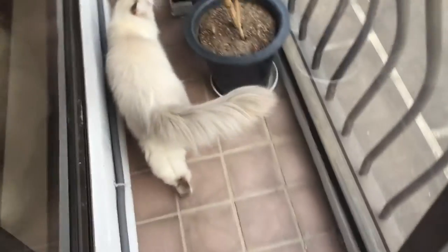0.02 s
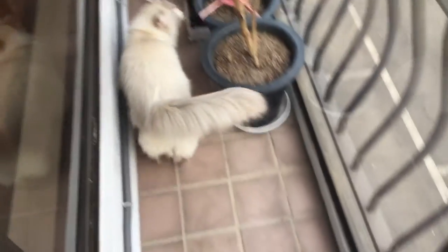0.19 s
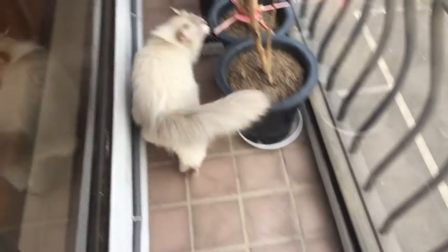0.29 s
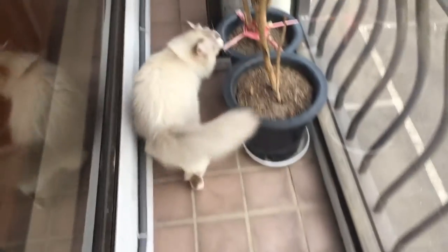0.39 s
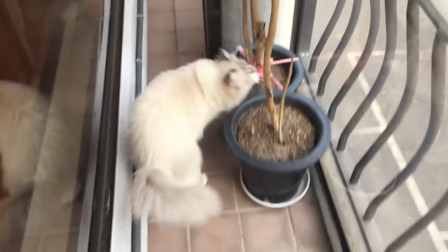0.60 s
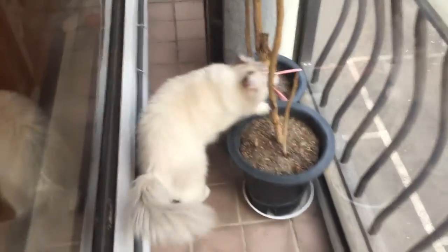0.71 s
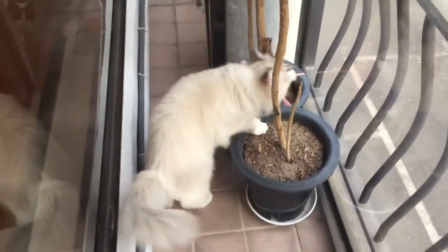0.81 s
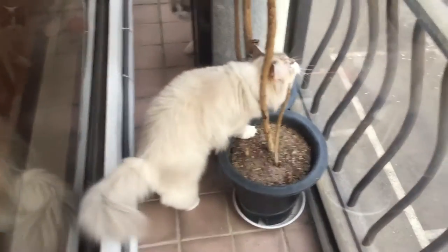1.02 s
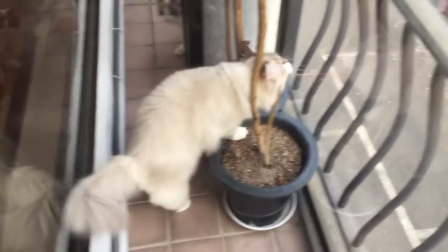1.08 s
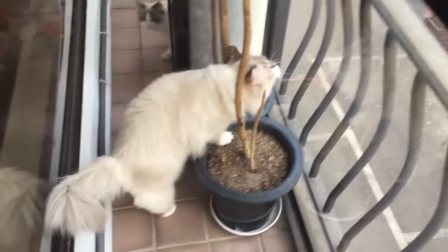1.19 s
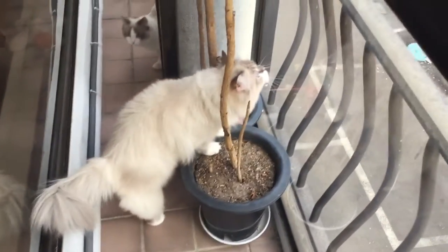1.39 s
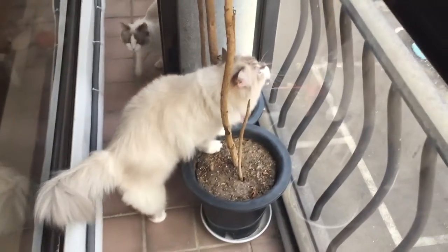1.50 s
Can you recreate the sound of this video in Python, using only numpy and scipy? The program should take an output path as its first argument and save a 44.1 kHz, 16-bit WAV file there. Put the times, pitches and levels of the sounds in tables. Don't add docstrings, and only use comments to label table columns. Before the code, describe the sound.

A cat gives one short trilling meow on a balcony, then a slipper knocks on tile

```python
import sys
import numpy as np
from scipy import signal
from scipy.io import wavfile
from scipy.ndimage import uniform_filter1d

SR = 44100
rng = np.random.default_rng(int(sys.argv[2]) if len(sys.argv) > 2 else 0)


def file_out(sig):
    cols = np.atleast_2d(sig).T
    lim = np.clip(cols, -1, 1)
    pcm = np.round(lim * 32767).astype(np.int16)
    wavfile.write(sys.argv[1], SR, pcm)


def ratio(d):
    e = np.asarray(d, float) / 20
    return 10 ** e


N = 66150

# f/Hz, level/dB per Hz
STREET_SPECTRUM = [(120, -27), (200, -5), (1140, -13.5), (1480, -12), (2130, -14), (2470, -17), (3490, -19),
                   (5330, -21), (16000, -33)]
# f/Hz, level/dB per Hz
RUMBLE_SPECTRUM = [(12, -38), (20, 0.5), (43, -5), (70, 6), (100, 0), (150, -10.5), (178, -8), (240, -37.5),
                   (310, -77), (530, -120)]
# f/Hz, level/dB
RAILING_TONES = [(1782, 0), (2143, -3), (2422, -5), (3601, -17), (4000, -13), (5254, -24), (5701, -25)]
# t/s, length/s, level/dB, tuning/ratio, tilt/dB per octave
RUBS = [
    (.054, 0.017, -50.5, 0.8, 6),
    (1.29, 0.017, -52, 0.99, 5),
    (1.308, .005, -60, 0.8, 8),
    (1.315, 0.0079, -53, 0.98, -17),
    (1.324, 0.015, -54.5, 1, -29),
    (1.34, 0.011, -58, 0.93, -1),
    (1.362, .004, -62, 1, -18),
]
# t/s, peak level/dB
CLAW_TICKS = [
    (.84, -54),
    (1.052, -51),
    (1.07, -42),
    (1.0875, -43),
    (1.345, -52),
    (1.394, -53),
    (1.438, -53),
    (1.481, -55),
]
# f/Hz, level/dB, time to fall 60 dB/s
CLAW_MODES = [(2500, -1.5, 0.011), (2755, -7.5, 0.032), (3690, 1, 0.0071), (4200, -6, 0.009),
              (4320, -6, 0.012), (5450, -7, 0.0041), (6930, -23, 0.0027), (8860, -15, 0.0047)]
# t/s, rise/s, fall/s, level/dB
RATTLES = [
    (1.058, 0.0022, 0.018, -71),
    (1.09, 0.016, 0.0074, -61),
]
# t/s, rise/s, fall/s, level/dB
FUR_SWISHES = [
    (.295, 0.018, 0.012, -63.5),
    (.48, 0.034, 0.042, -73.5),
    (.54, 0.027, 0.017, -69.5),
]
# t/s, rise/s, fall/s, level/dB
SCUFF_SWELLS = [(.02, 0.25, 0.041, -50), (.1, 0.027, 0.019, -54.5), (.31, 0.0061, 0.0052, -59),
                (.6, 0.045, 0.018, -66), (.77, 0.025, 0.037, -66), (.845, 0.011, 0.021, -62.5),
                (.91, 0.013, 0.012, -62), (.955, 0.024, 0.014, -63), (1.18, 0.0067, 0.088, -56),
                (1.225, 0.014, 0.02, -47.5), (1.3, 0.005, 0.013, -62), (1.41, 0.011, 0.011, -65)]
# f/Hz, level/dB per Hz
SCUFF_SPECTRUM = [(180, -43), (300, -11), (447, -37), (1100, -15), (1480, -15.5), (1720, -11.5),
                  (3580, -10.5), (9550, -18), (16000, -24)]
# t/s, peak level/dB, tuning/ratio, tilt/dB per octave
SOLE_KNOCKS = [
    (.906, -44, .9, 2),
    (.917, -52, 1.0, 3),
    (.94, -58, 1.05, 4),
    (.97, -54, .88, -8),
    (1.171, -38, 1.03, 1),
    (1.198, -40, .9, -18),
    (1.206, -44, .88, -18),
    (.51, -53, .9, -6),
]
# f/Hz, level/dB, time to fall 60 dB/s
SOLE_MODES = [(335.8, 5.5, 0.055), (500, -27, 0.036), (685, -5, 0.036), (855, -1.5, 0.017),
              (1153, -5.5, 0.028), (1495, -3.5, 0.019), (1665, -1, 0.01), (1945, -2.5, 0.019),
              (2600, -3, 0.0085), (4540, -13, 0.0067)]
# t/s, pitch f/Hz, level/dB, roughness/0 to 1
CREAK_PART = [
    (0.14, 286, -60, .6),
    (.16, 284, -51, .5),
    (0.184, 290, -45, 0.5),
    (0.192, 400, -46, .3),
    (0.208, 380, -47, 0.25),
    (.224, 425, -43, .3),
    (0.238, 432, -43, 0.3),
]
CHIRP_PART = [
    (.244, 445, -46, .4),
    (.2475, 460, -34, .5),
    (.251, 475, -30, .5),
    (.255, 498, -35, .3),
    (.264, 507, -27, .2),
    (.274, 512, -38, .2),
    (.28, 513, -27, .12),
    (.293, 515, -30, .15),
    (.299, 525, -43, .5),
]
WAVER_PART = [
    (0.309, 555, -41.5, 0.25),
    (0.317, 574, -41, 0.088),
    (0.356, 573.8, -38, .08),
    (0.376, 609.3, -35.5, 0.055),
    (.396, 612, -30.5, 0.067),
    (0.412, 575.3, -47.5, 0.18),
    (0.432, 599.4, -28.5, 0.071),
    (0.449, 606.9, -29.5, .05),
    (0.468, 591.3, -32.5, 0.17),
]
DRAWL_PART = [(0.479, 508, -35.5, 0.095), (0.491, 565, -32, 0.092), (0.502, 603.5, -29, 0.11),
              (0.521, 588.5, -25.5, 0.098), (0.539, 548.6, -27, 0.074), (0.552, 560.8, -31, 0.114),
              (0.564, 564, -31.5, 0.25), (0.584, 568.8, -35, 0.16), (0.6, 597.7, -40, 0.3),
              (0.644, 589, -47, 0.12), (0.667, 650, -58.5, 1)]
# t/s, first resonance f/Hz, second resonance f/Hz, brightness level/dB
MOUTH_SHAPE = [(.14, 540, 1750, -28), (.19, 645, 1790, -11.5), (.23, 835, 2080, -1), (.26, 1070, 2330, 8.5),
               (.287, 1220, 2090, 13), (.31, 1160, 2360, 4), (.345, 1400, 2840, -8), (.385, 1460, 2500, 13),
               (.45, 1710, 2500, 5), (.465, 1740, 2600, -11.5), (.485, 1400, 2200, -12),
               (.515, 1810, 2660, 21), (.54, 1240, 2460, 6), (.575, 1500, 2500, -1.5),
               (.61, 1370, 2600, -5), (.66, 1270, 2400, 3)]
# t/s, third resonance level/dB, fourth resonance level/dB, hum through the nose level/dB
THROAT_SHAPE = [(.2, -11, -51, -71), (.29, -52, -36.5, -58), (.33, -11, -17, -47), (.375, -35, -30.5, -52),
                (.41, -8, -24, -47), (.44, -23, -39, -48), (.465, 1.5, -43, -50), (.488, 0, -24.5, -66),
                (.505, -10.5, -32.5, -48.5), (.54, 0, -32.5, -58.5), (.57, 0.5, -27, -58),
                (.595, -4.5, -12, -53.5), (.63, -6, -5.5, -51.5), (.66, -2.5, -17, -59)]


def in_time(rows):
    times, *columns = np.transpose(rows)
    return [np.interp(np.arange(N) / SR, times, column) for column in columns]


def rms_one(x):
    return x / np.sqrt(np.mean(x ** 2) + 1e-20)


def filtered(x, order, cutoff_hz, kind):
    return signal.sosfilt(signal.butter(order, cutoff_hz, kind, fs=SR, output="sos"), x)


def drift(rate_hz):
    r = np.exp(-2 * np.pi * rate_hz / SR)
    wander = signal.lfilter([1], [1, -2 * r, r * r], rng.standard_normal(N + SR))
    return rms_one(wander[SR:])


def coloured(spectrum, patchy_db):
    hz, db = np.transpose(spectrum)
    white = rng.standard_normal((2, N + SR))
    edges = 20 * 2 ** np.arange(0, 10.1, .5)
    out = 0
    for k, (low, high) in enumerate(zip(edges, edges[1:])):
        level_db = np.interp(np.log(low * high) / 2, np.log(hz), db, left=-90)
        band = filtered(white[k % 2], 2, [low, high], "band")[SR:]
        out = out + ratio(level_db + patchy_db * drift(38)) * band
    return rms_one(out)


def swells(rows):
    t = np.arange(N) / SR
    power = 0
    for start, rise, fall, db in rows:
        side = np.where(t < start, rise, fall)
        power = power + ratio(2 * db) * np.exp(-((t - start) / side) ** 2)
    return np.sqrt(power)


def struck(hits, modes, spread_db, contact_s):
    out = np.zeros(N + SR)
    t = np.arange(SR // 2) / SR
    chance = rng.standard_normal((len(hits), len(modes)))
    for (start, db, tuning, tilt_db), lucks in zip(hits, chance):
        first = int(start * SR)
        for (hz, mode_db, t60), luck in zip(modes, lucks):
            level_db = db + mode_db - 0.5 + spread_db * luck + tilt_db * np.log2(hz / modes[0][0])
            fade = ratio(level_db - 60 * t / t60) * (1 - np.exp(-t / contact_s))
            out[first:first + len(t)] += np.sin(2 * np.pi * hz * tuning * t + luck) * fade
    return out[:N]


def peak(hz, centre_hz, width_hz):
    return 1 / (1 + (2 * (hz - centre_hz) / width_hz) ** 4) + .002


def street():
    hiss = ratio(-66.5) * coloured(STREET_SPECTRUM, patchy_db=1.0)
    rumble = filtered(coloured(RUMBLE_SPECTRUM, patchy_db=-1.0), 4, 260, "low")
    return hiss + ratio(-52) * rumble


def balcony(x):
    bass_escape_hz, wall_cut_hz = 430, 2580
    low_t60_s, treble_t60_s = 0.34, 0.16
    t = np.arange(SR) / SR
    noise = rng.standard_normal((2, SR))
    low = filtered(noise[0], 2, [bass_escape_hz, wall_cut_hz], "band") * ratio(-60 * t / low_t60_s)
    high = filtered(noise[1], 2, wall_cut_hz, "high") * ratio(-60 * t / treble_t60_s)
    echoes = (low + high) * (t > .004)
    strength = np.sqrt(np.sum(low ** 2) * SR / 2 / wall_cut_hz)
    return signal.fftconvolve(x, echoes)[:N] * ratio(-2.5) / strength


def railing():
    rise_s, fall_s, roughness = .0006, .004, .6
    t = np.arange(N) / SR
    out = 0
    for hz, mode_db in RAILING_TONES:
        rasp = 1 + roughness * drift(140)
        for start, length, db, tuning, tilt_db in RUBS:
            rise = np.clip((t - start) / rise_s, 0, 1)
            fall = np.exp(-np.maximum(t - start - length, 0) / fall_s)
            level_db = db + mode_db + tilt_db * np.log2(hz / RAILING_TONES[0][0])
            out = out + ratio(level_db) * rise * fall * rasp * np.sin(2 * np.pi * hz * tuning * t)
    return out


def small_things():
    grains = rng.standard_normal(N) * ratio(4.0 * drift(150))
    rattle = filtered(grains, 2, [1400, 4300], "band")
    swish = filtered(rng.standard_normal(N), 4, 13000, "high")
    hits = [(start, db, 1, 0) for start, db in CLAW_TICKS]
    ticks = struck(hits, CLAW_MODES, spread_db=1.5, contact_s=.0004)
    return ticks + swells(RATTLES) * rms_one(rattle) + swells(FUR_SWISHES) * rms_one(swish)


def slipper():
    grain = ratio(2.0 * drift(63))
    scuffs = swells(SCUFF_SWELLS) * grain * coloured(SCUFF_SPECTRUM, patchy_db=2.0)
    return scuffs + struck(SOLE_KNOCKS, SOLE_MODES, spread_db=2.0, contact_s=.0007)


def cat():
    jitter, shimmer_db, breath_db = .026, 1.4, -3
    half_pitch_share, release_s = .7, 0.021
    rows = CREAK_PART + CHIRP_PART + WAVER_PART + DRAWL_PART
    pitch, level_db, rough = in_time(rows)
    first, second, bright_db = in_time(MOUTH_SHAPE)
    third_db, fourth_db, hum_db = in_time(THROAT_SHAPE)
    rough = np.clip(rough, 0, 1)
    t = np.arange(N) / SR
    shaky_pitch = uniform_filter1d(pitch, size=200) * (1 + jitter * rough * drift(180))
    phase = 2 * np.pi * np.cumsum(shaky_pitch) / SR

    voice, power = 0, 0
    for k in range(1, 13):
        hz = k * pitch
        upper = peak(hz, second, 950)
        upper = upper + ratio(third_db) * peak(hz, 3500, 900)
        upper = upper + ratio(fourth_db) * peak(hz, 5100, 1500)
        gain = peak(hz, first, 900) + ratio(bright_db) * upper
        breath = ratio(breath_db) * (rough + .006 * k * k) * drift(200)
        shimmer = ratio(shimmer_db * (0.22 + rough + 0.071 * k) * drift(34))
        voice = voice + gain * (shimmer + breath) * np.sin(k * phase + k * k * 0.39)
        power = power + gain ** 2 / 2

    pulses = 1 + half_pitch_share * rough * np.cos(phase / 2)
    voice = voice * pulses / np.sqrt(power) * ratio(level_db - 4)
    hum = ratio(hum_db + 2.0 * drift(45)) * (1 + 0.083 * drift(320)) * np.sin(phase + 0.21)
    fade_in = np.clip((t - rows[0][0]) / 0.01, 0, 1)
    fade_out = np.exp(-np.maximum(t - rows[-1][0], 0) / release_s)
    return (voice + hum) * fade_in * fade_out


def scene():
    near = cat() + slipper() + small_things()
    return (near + balcony(near) + street() + railing())[None]


def band_limit(x):
    return signal.sosfilt(signal.butter(12, 16310, fs=SR, output="sos"), x)


def record(dry):
    top_cut = signal.cheby2(12, 60, 16450, fs=SR, output="sos")
    mix = signal.sosfilt(top_cut, dry)
    return band_limit(mix)


dry = scene()
out = record(dry)
file_out(out)
```